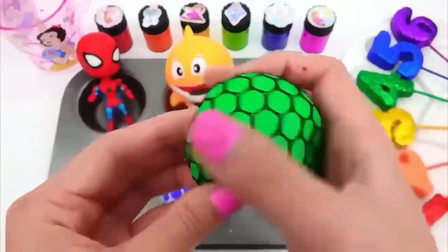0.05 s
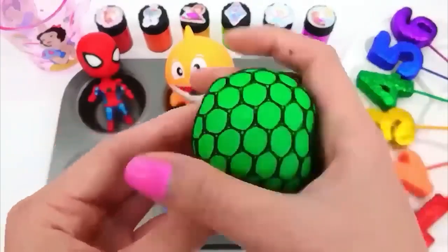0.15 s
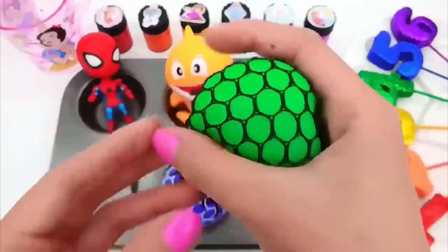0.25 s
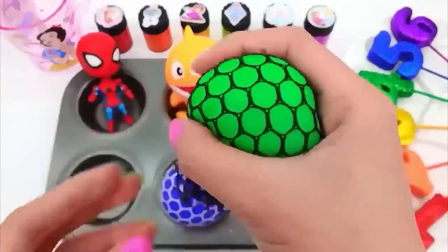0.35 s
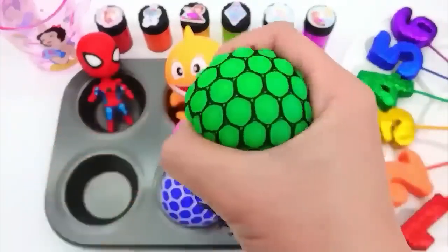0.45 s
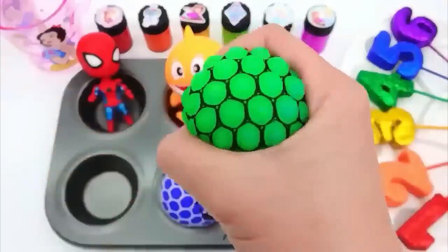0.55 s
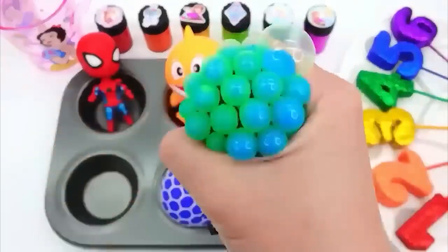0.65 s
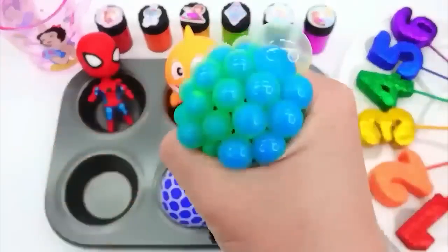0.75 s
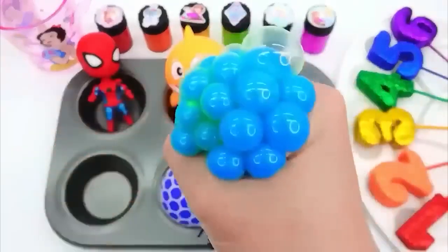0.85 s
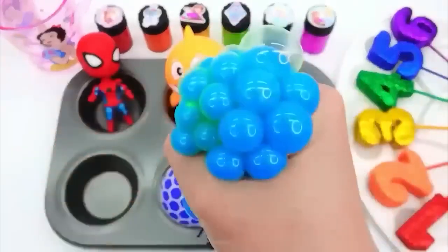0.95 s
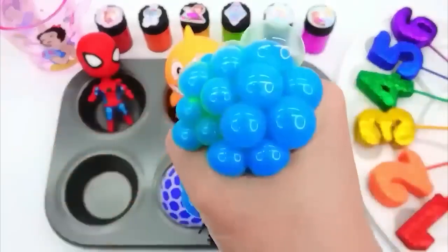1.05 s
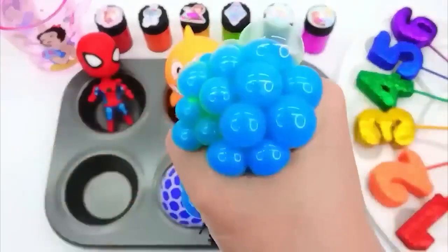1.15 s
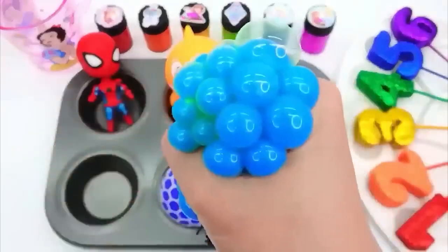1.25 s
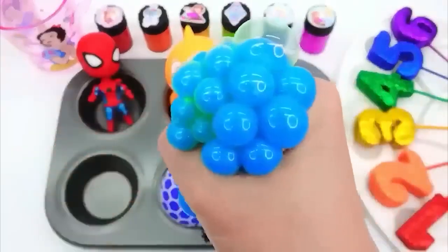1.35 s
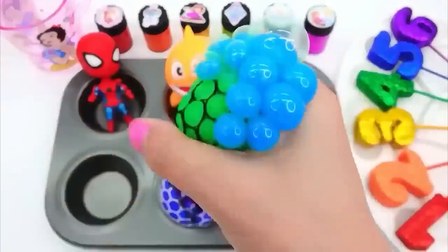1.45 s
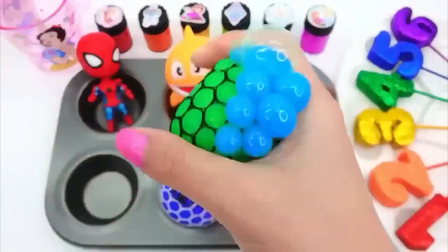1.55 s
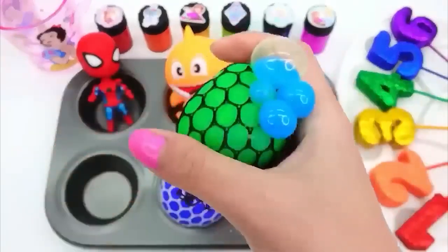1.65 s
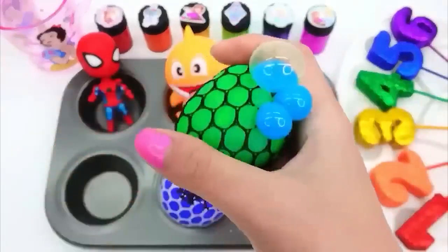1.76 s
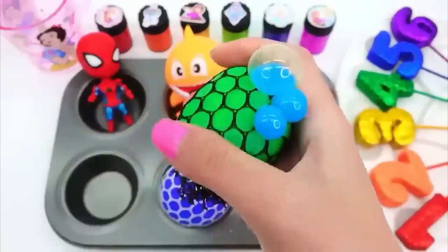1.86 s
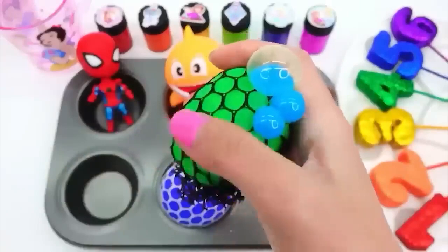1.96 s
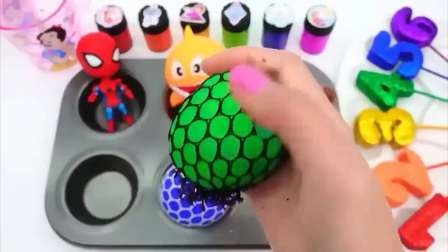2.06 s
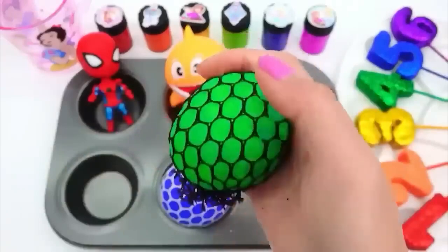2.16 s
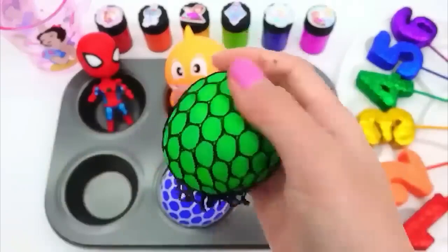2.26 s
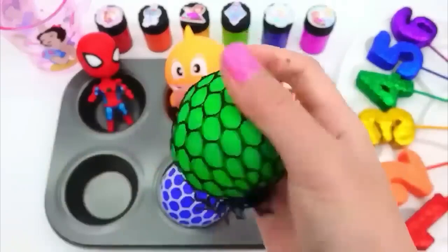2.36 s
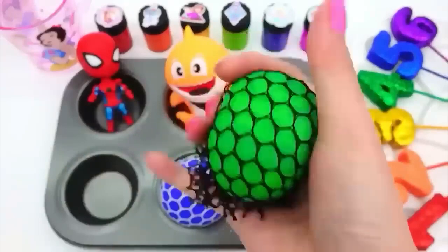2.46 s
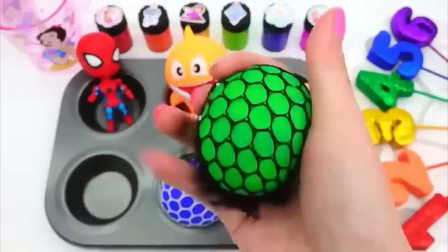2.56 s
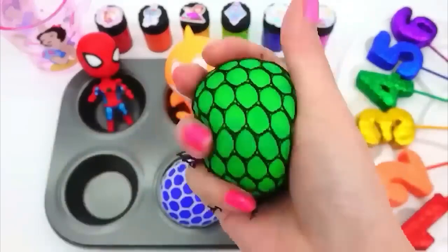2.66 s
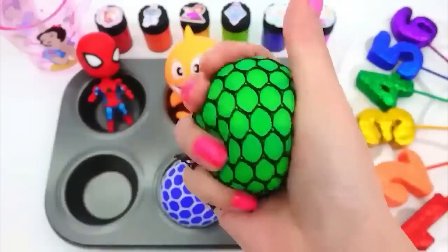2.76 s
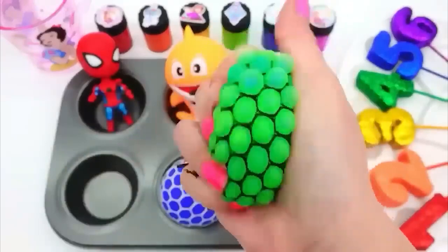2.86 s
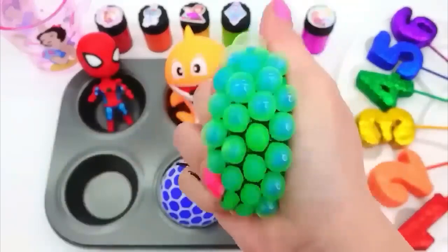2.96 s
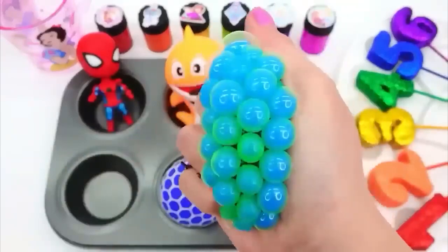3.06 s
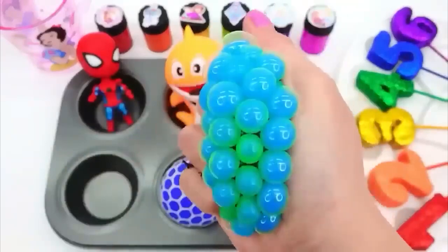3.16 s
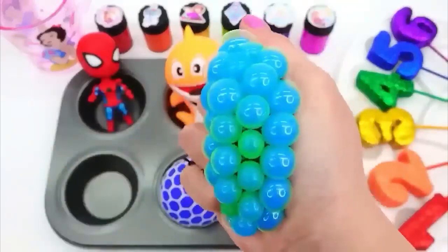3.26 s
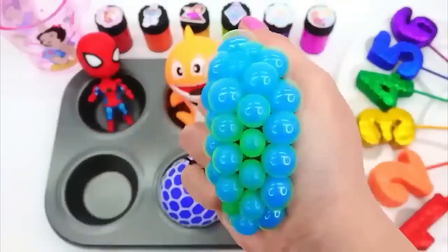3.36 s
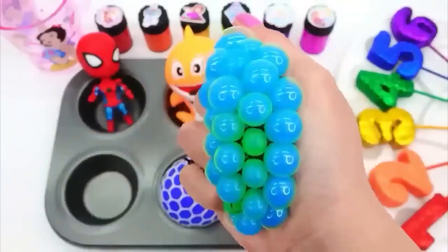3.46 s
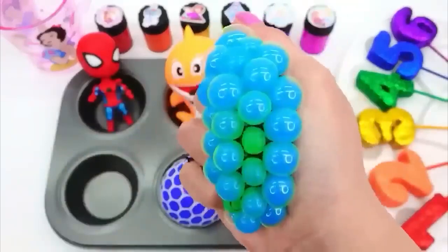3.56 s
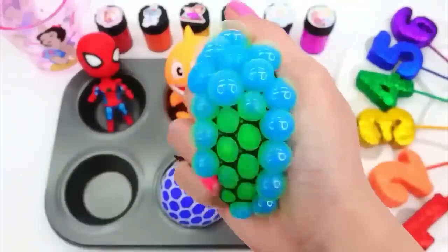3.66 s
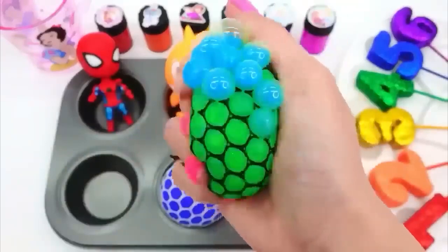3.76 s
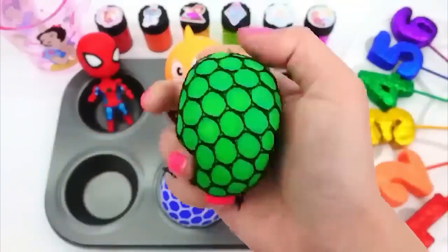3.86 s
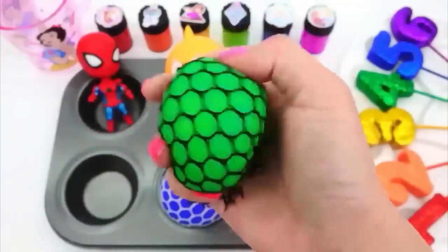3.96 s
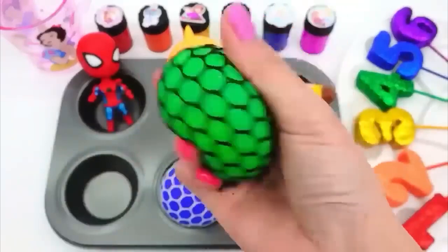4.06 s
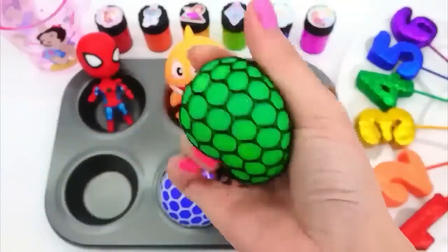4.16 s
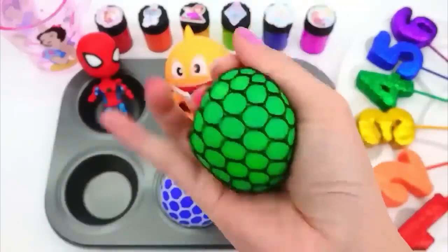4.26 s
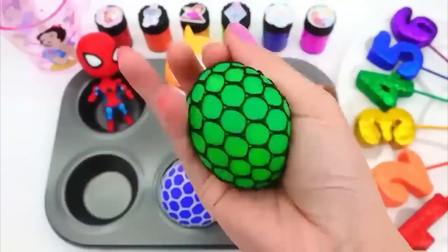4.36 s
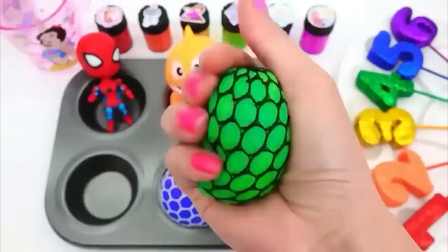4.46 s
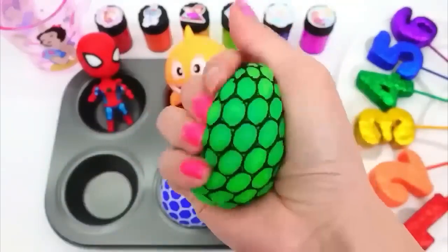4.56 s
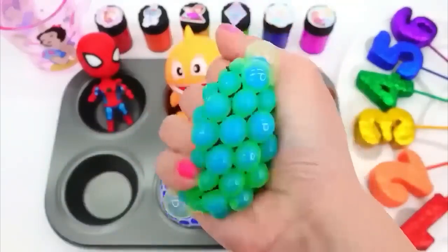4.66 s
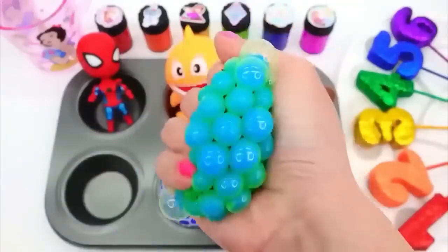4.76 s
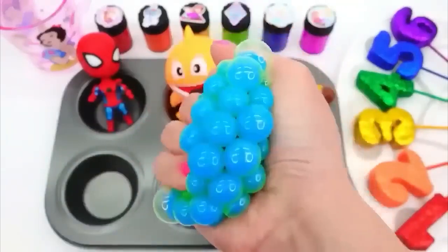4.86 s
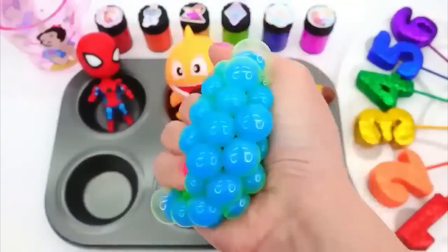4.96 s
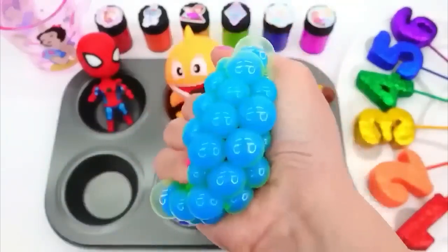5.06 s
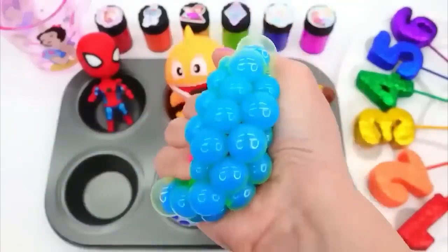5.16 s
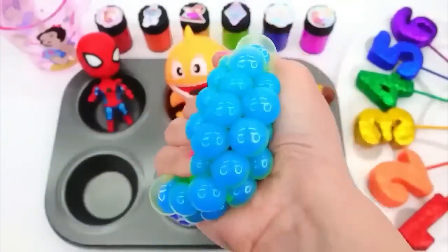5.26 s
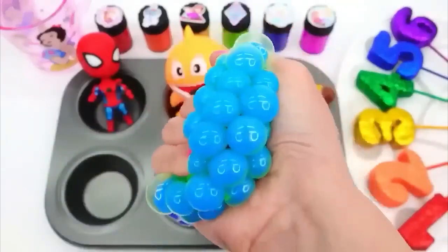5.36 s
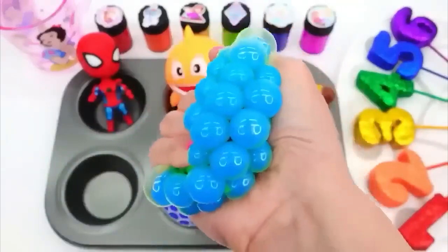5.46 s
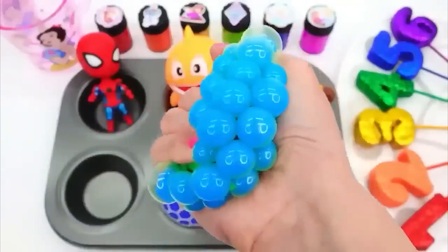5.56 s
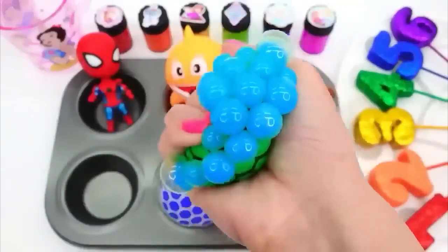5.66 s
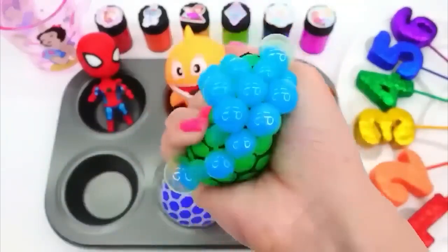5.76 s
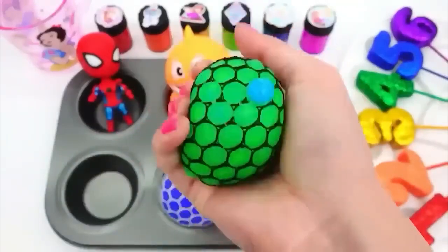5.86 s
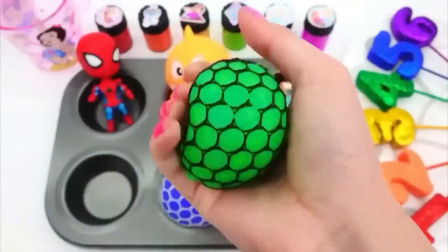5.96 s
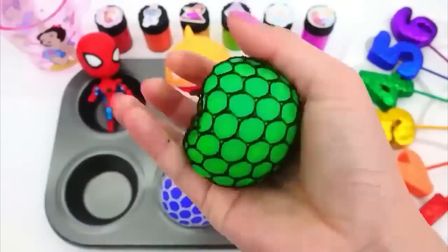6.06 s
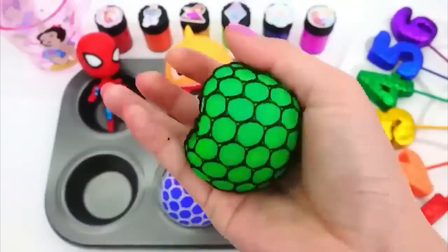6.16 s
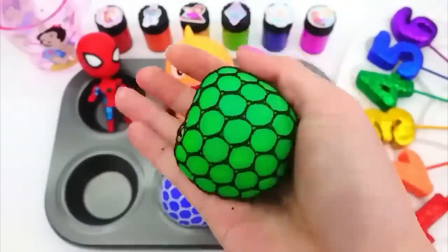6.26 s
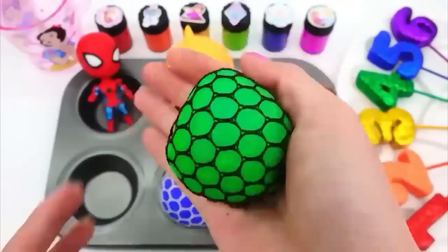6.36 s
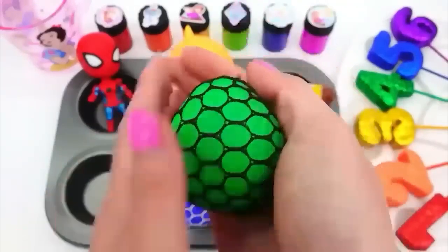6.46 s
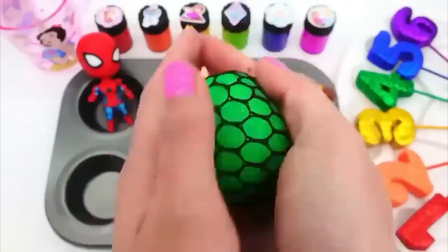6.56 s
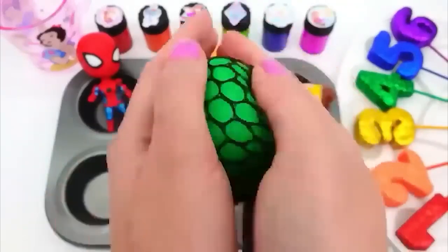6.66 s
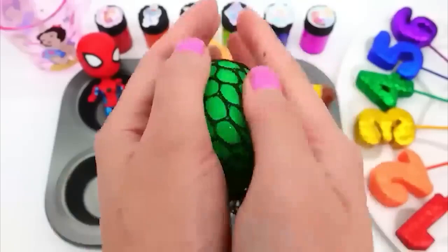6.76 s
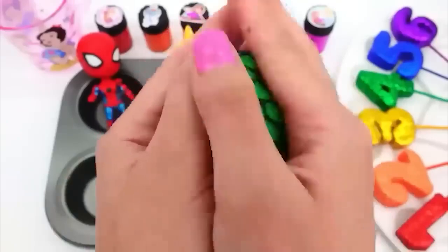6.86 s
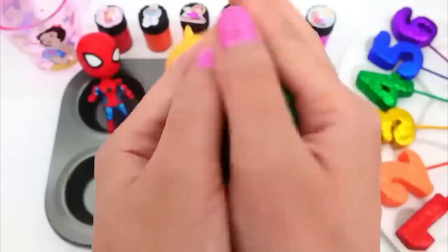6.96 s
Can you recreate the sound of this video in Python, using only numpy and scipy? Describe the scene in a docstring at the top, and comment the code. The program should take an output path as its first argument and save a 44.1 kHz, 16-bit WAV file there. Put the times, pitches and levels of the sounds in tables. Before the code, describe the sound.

A hand squeezes a gel-filled ball in a mesh net three times, with loud wet squelching, crackling pops and faint rubbing between, heard very close.

```python
"""Small live room, close microphone: a hand squeezes a gel ball in a mesh net three times over a metal tray.
Each squeeze and release forces air pockets through the gel: chirping pops over a wet crackle of tiny chirps.
Between squeezes the net rubs in the fingers: random impulses through three filters.
Faint sine blips and a low rumble of filtered noise lie beneath. A fast limiter flattens the loudest pops."""
import sys
import numpy as np
from scipy import signal
from scipy.fft import rfft, irfft
from scipy.io import wavfile
from scipy.ndimage import uniform_filter1d, minimum_filter1d, map_coordinates

SR = 44100
rng = np.random.default_rng(int(sys.argv[2]) if len(sys.argv) > 2 else 0)


def int16_out(signal):
    """Quantize to a 16-bit WAV file."""
    q = np.round(np.clip(np.atleast_2d(signal).T, -1, 1) * 32767)
    wavfile.write(sys.argv[1], SR, q.astype(np.int16))


N = 308700
TIME = np.arange(N) / SR

# air pockets popping: [t/s, relative level/dB, final pitch f/Hz, swell time/s, relative skin snap/dB]
AIR_POCKETS = [(0.8477, -8, 1494, 0.0025, -31.5), (0.8508, -14, 231.5, .002, -34),
               (0.8555, -2.5, 3630, 0.0019, -25), (0.892, 6.5, 3380, 0.0018, -22),
               (1.0511, 1.5, 6340, .003, -10.5), (1.0748, -6.5, 6500, 0.0023, -8.5),
               (1.1228, 3.5, 6240, 0.00099, -9), (1.2052, -18, 10800, .003, -7.5),
               (1.2265, -20, 7030, .003, -3), (1.2985, 3.5, 3974, 0.0015, -14.5),
               (1.2991, -4, 3155, 0.0015, -32.5), (1.3478, -18.5, 7460, 0.00093, 1.5),
               (1.645, -27.5, 4670, 0.0038, -17.5), (1.7079, -11, 10670, 0.0021, -3.5),
               (1.759, -6.5, 3650, 0.0025, -31), (1.766, 3.5, 4130, .0023, -14),
               (1.7903, -8, 3260, .0014, -24), (1.7991, -5.5, 2150, 0.0027, -15),
               (1.827, 3, 2800, 0.00064, -18), (1.8629, -3, 4115, 0.0024, -9),
               (1.8662, -1, 1910, .001, -27.5), (1.9297, -8.5, 3650, 0.00059, 0.5),
               (1.9747, -8.5, 3925, 0.0028, -14), (2.0828, -14.5, 2030, 0.0022, -10),
               (2.303, 0.5, 3337, 0.0028, -15), (2.3101, -3, 1063, 0.0014, -20),
               (2.3574, -5, 930, .0018, -59), (2.409, -39.5, 6660, 0.0017, 20),
               (3.172, -17.5, 503, .002, -36), (3.1719, -1, 1110, 0.0025, -29.5),
               (3.1757, -3.5, 4274, .003, -34.5), (3.239, 8.5, 4960, 0.00074, -27),
               (3.2458, -5, 5190, .003, -27), (3.2739, 5.5, 5400, 0.00037, -19.5),
               (3.328, -4, 4520, 0.0016, -2), (3.3471, 2.5, 4610, 0.0034, -5),
               (3.413, -13, 5580, .003, -9.5), (3.4748, -14, 5000, 0.0034, -1),
               (3.5248, -4, 4380, 0.00026, -3.5), (3.5726, -9, 8650, 0.0011, -9),
               (3.6198, -8, 14800, .0004, -12), (3.6516, -4.5, 10640, 0.00062, -12.5),
               (3.6967, -7, 4550, 0.001, -37.5), (3.7014, -3, 4250, 0.00058, -38),
               (3.7112, -2, 4160, 0.00054, -22.5), (3.7423, -6.5, 4140, .0014, -5.5),
               (3.75, -13, 3865, 0.003, 7), (3.7741, -14, 5000, .0007, -6.5),
               (3.897, -6.5, 3770, 0.0016, -22), (3.904, 8, 5580, 0.0015, -37.5),
               (3.9317, -6, 4500, 0.0039, -21.5), (3.9446, 4, 4440, 0.0017, -15.5),
               (3.9729, -5.5, 4190, 0.003, -17.5), (4.0122, 5, 4940, .0023, -21.5),
               (4.0326, 1.5, 2250, 0.00074, -18.5), (4.0462, -6, 3310, 0.0021, -12),
               (4.0524, -2.5, 1180, 0.0031, -19.5), (4.1125, -2, 1487, .0011, -16),
               (4.8874, -17, 470, .002, -41.5), (4.8891, -9, 1128, 0.00049, -42),
               (4.8889, -3, 4600, 0.0024, -32), (4.8957, -1, 3830, .0023, -38),
               (4.9153, -2.5, 4080, 0.0021, -46), (4.947, -5.5, 3580, 0.0029, -17.5),
               (4.995, 2, 4852, 0.0027, -18.5), (5.009, -5.5, 4550, 0.00055, 0),
               (5.0302, 7.5, 4590, 0.00099, -27), (5.054, -4.5, 5200, .0004, -24),
               (5.0606, -5.5, 4870, .003, -21), (5.0886, -6, 5050, 0.0027, -13.5),
               (5.184, -8, 3150, 0.00055, 0), (5.1983, 4, 4080, .0014, -7),
               (5.2648, -2.5, 5300, 0.0021, -29.5), (5.2865, -6.5, 5480, 0.0012, -24.5),
               (5.4001, -23, 6084, 0.0056, 5.5), (5.41, -16.5, 6490, 0.00244, 4.5),
               (5.571, -29.5, 4740, 0.0016, -3.5), (5.684, -28, 6800, 0.00035, -3),
               (5.806, -23.5, 6100, 0.00114, -3.5), (5.8462, 8.5, 4680, 0.001, -14.5),
               (5.8607, -9.5, 2114, 0.0026, -25), (5.8763, -2.5, 4800, 0.00089, -20.5),
               (5.8971, -2, 4320, 0.0018, -27), (5.9362, 9.5, 5136, 0.0013, -12.5),
               (5.957, -9.5, 3927, 0.004, -17), (5.996, 2.5, 4284, 0.003, -19.5),
               (6.0565, 6.5, 4930, 0.00025, -17.5), (6.075, -1, 2962, 0.0033, -13.5),
               (6.081, -5.5, 1020, 0.0016, -33), (6.1178, -1, 3464, 0.0027, -17.5),
               (6.1208, 0, 1310, 0.0011, -32.5), (6.1517, 3.5, 4140, 0.00097, -14),
               (6.4987, -16.5, 1316, 0.0024, -49)]
# fist closing: [start t/s, length/s, then relative level/dB of large gurgles, small bubbles, sticky skin]
CLOSINGS = [(0.904, 0.22, -30, -42, -51), (1.035, .22, -38.5, -26.5, -28), (3.198, 0.35, -29, -20, -32),
            (3.472, 0.16, -60.5, -69, -33), (4.886, 0.44, -42, -20, -36), (5.198, 0.22, -59, -17, -29),
            (5.399, 0.14, -71.5, -45.5, -42)]
# fist opening: [same columns]
OPENINGS = [(1.704, 0.16, -22.5, -22.5, -27), (1.85, 0.25, -48, -56.5, -59),
            (3.735, 0.077, -72, -25.5, -31.5), (3.892, .29, -18.5, -27, -33),
            (5.838, .18, -33.5, -22.5, -34.5), (6.02, 0.23, -21.5, -32, -34.5)]


def amp(db):
    """Decibels to gain."""
    return 10 ** (np.asarray(db) / 20)


def unit(x):
    """Scales to rms 1."""
    return x / np.sqrt(np.mean(x ** 2) + 1e-20)


def read(points, hz):
    """Reads a spectrum on a log-frequency axis."""
    f, value = np.transpose(points)
    return np.interp(np.log(hz + 1), np.log(f + 1), value)


def colour(x, points):
    """Filters x by a spectrum in dB."""
    gain = amp(read(points, np.fft.rfftfreq(len(x), 1 / SR)))
    return irfft(rfft(x) * gain, len(x))


def noise(points):
    """Coloured noise of rms 1."""
    return unit(colour(rng.standard_normal(N), points))


def level(points):
    """Gain over time from (s, dB) points."""
    s, db = np.transpose(points)
    return amp(np.interp(TIME, s, db, left=-100))


def add(mix, s, sound):
    """Adds a sound to the mix at time s."""
    part = mix[max(round(s * SR), 0):][:len(sound)]
    part += sound[:len(part)]


def swell(t, rise_s):
    """Climbs smoothly to 1 at rise_s, then dies away."""
    u = t / rise_s
    return (u * np.exp(1 - u)) ** 2


def chirp(t, hz, rise_s, glide_octaves, glide_time=1.1):
    """Phasor of a shrinking air pocket: the pitch climbs by glide_octaves towards hz."""
    pitch_hz = hz * 2 ** (-glide_octaves * np.exp(-t / (rise_s * glide_time)))
    return np.exp(2j * np.pi * (np.cumsum(pitch_hz) / SR + rng.random()))


def rumble(rumble_db=-3.0):
    """Low background rumble: coloured noise with a slowly moving level."""
    # rumble spectrum: [f/Hz, level/dB]
    floor_colour = [(20, -20.5), (50, -12), (100, -17), (220, -3), (400, -11), (1000, -8), (4000, -16),
                    (16000, -25)]
    # rumble over time: [t/s, relative level/dB]
    floor_level = [(0.0, -59), (0.99, -57), (1.15, -58.5), (5.63, -58.5), (6.18, -47), (7.0, -68)]
    return amp(rumble_db) * noise(floor_colour) * level(floor_level)


def uneven(tail, ripple_db=1.5, ripple_hz=70):
    """Walls favour some narrow bands and swallow others."""
    z = rfft(tail)
    width_bins = round(ripple_hz * len(tail) / SR)
    ripple = unit(uniform_filter1d(rng.standard_normal(len(z)), size=width_bins))
    return irfft(z * unit(amp(ripple_db * ripple.clip(-2, 2))), len(tail))


def ringing(ring_db=-1, ring_t60_s=0.39):
    """The room's resonances answer a click as decaying sines."""
    # room resonances: [f/Hz, relative level/dB]
    room_modes = [(532, 2.5), (603, 7.5), (706, 3), (769, 6.5), (858, 0.5), (1055, 6.5), (1162, 4.5),
                  (1465, 10), (1706, 3.5), (1932, 7), (2102, 3.5), (2517, 4.5), (3243, -0.5), (3526, 5.5)]
    t = TIME[:SR]
    fade = amp(-60 * t / ring_t60_s)
    modes = sum(amp(db) * np.sin(2 * np.pi * (hz * t + rng.random())) for hz, db in room_modes)
    return amp(ring_db) * 2 * modes * fade / fade.sum()


def room(x, wet_db=-7.0, build_s=0.007, first_db=-7, flutter_s=0.036, flutter=0.1):
    """Sparse reflections build up, flutter between two walls, then die by band."""
    # reverberation time by band: [f/Hz, T60/s]
    room_t60 = [(250, 0.13), (700, 0.94), (1700, 0.55), (4000, 0.5), (8000, 0.47), (15000, 0.9)]
    # reverberation spectrum: [f/Hz, level/dB]
    room_colour = [(60, -17), (250, 10), (600, -7), (1500, -3), (3800, -3), (6000, -4.5), (10000, -10),
                   (16000, -24)]
    t = TIME[:SR]
    taps = rng.choice([-1., 1.], SR) * (rng.random(SR) < 2000 / SR)  # about 2000 reflections/s
    taps = sum(flutter ** k * np.roll(taps, round(k * flutter_s * SR)) for k in range(5))
    taps *= amp(np.interp(t, [0, build_s], [first_db, 0])) * (t > .003)
    hz, at, z = signal.stft(taps, SR, nperseg=256)
    decay = amp(-60 * at / read(room_t60, hz)[:, None])
    tail = signal.istft(z * decay, SR, nperseg=256)[1][:SR]
    mid_decay = amp(-60 * t / room_t60[2][1])
    strength = np.sqrt(np.sum((taps * mid_decay) ** 2))
    response = uneven(tail / strength) + ringing()
    return amp(wet_db) * colour(signal.fftconvolve(x, response)[:N], room_colour)


def tray(x, delay_s=.0016, echo_db=-12.5):
    """The metal tray under the hand returns a quick, filtered first reflection."""
    # tray reflection spectrum: [f/Hz, level/dB]
    tray_colour = [(300, 2), (1500, -1), (4000, -16), (10000, -7.5)]
    echo = np.interp(TIME - delay_s, TIME, colour(x, tray_colour), left=0)
    return x + amp(echo_db) * echo


def blips():
    """Faint soft sine tones that swell and die away."""
    # faint soft blips: [t/s, level/dB, pitch f/Hz, swell time/s]
    blip_rows = [(0.178, -38.5, 688, 0.0062), (0.205, -47.5, 1060, 0.023), (0.335, -42.5, 680, 0.034),
                 (0.364, -32.5, 679, 0.0071), (0.485, -48, 108, 0.062), (0.51, -47, 612, 0.0091),
                 (1.265, -44, 1027, .012), (1.53, -52, 875.6, 0.02), (3.172, -26.5, 185, 0.0071),
                 (5.098, -37, 1136, 0.03), (5.69, -46.5, 255.5, 0.014), (5.752, -36, 770, 0.045)]
    out, t = np.zeros(N), TIME[:SR // 2]
    for s, db, hz, rise_s in blip_rows:
        add(out, s, amp(db) * swell(t, rise_s) * np.sin(2 * np.pi * hz * t))
    return out


def pushes():
    """Dull pushes of the ball against the palm: swells of coloured noise."""
    # pushes: [t/s, level/dB, swell time/s]
    push_rows = [(0.83, -32, 0.0087), (0.8522, -6.5, 0.0013), (1.748, -55, 0.0067), (3.172, -41.5, 0.002),
                 (4.051, -26, 0.0039), (4.112, -30, 0.0059), (5.197, -43, 0.0084), (5.846, -34, 0.0057)]
    # push spectrum: [f/Hz, level/dB]
    push_colour = [(20, -4.5), (90, -14.5), (250, -8.5), (600, -1), (1200, -12.5), (3000, -37)]
    gain = np.zeros(N)
    for s, db, rise_s in push_rows:
        add(gain, s, amp(db) * swell(TIME[:SR // 2], rise_s))
    return gain * noise(push_colour)


def rubbing(order):
    """Gain over time of one part of the net's sound: each slip swells and dies away."""
    # net slipping: [t/s, swell time/s, then relative level/dB of palm rub, thread rasp, hiss]
    rub_rows = [(2.675, 0.025, -46, -38, -46.5), (2.78, 0.061, -61, -70, -89),
                (3.013, 0.038, -86, -43, -89), (3.135, 0.029, -49, -35, -67), (4.3, 0.11, -51, -36.5, -55),
                (4.438, 0.029, -40, -50, -44.5), (4.518, 0.031, -44, -50, -55),
                (4.72, 0.056, -56, -47, -67), (6.42, 0.099, -87.5, -48.5, -89),
                (6.65, 0.019, -54, -59, -97), (6.8, 0.045, -47, -47, -64.5), (6.95, 0.04, -60, -51, -43)]
    gain = np.zeros(N)
    for s, rise_s, *db in rub_rows:
        add(gain, s, amp(db[order]) * swell(TIME[:SR], rise_s))
    return gain


def net(rub_db=3.5, rasp_db=-5.5, hiss_db=-2.5, slips_per_s=3000, spread_db=-2.5, grip_db=3):
    """Threads stick and slip on the skin in uneven bouts and ring the hollow of the hand."""
    # palm rub spectrum: [f/Hz, level/dB]
    rub_colour = [(500, -21.5), (880, -18), (1080, 16.5), (1220, 8.5), (1450, -11), (2000, -37.5)]
    # thread rasp spectrum: [f/Hz, level/dB]
    rasp_colour = [(900, -38), (1350, 1.5), (1600, 6.5), (1950, 6), (2600, -8.5), (4500, -8), (8000, -38)]
    # hiss spectrum: [f/Hz, level/dB]
    hiss_colour = [(2500, -26), (4500, -1.5), (8000, 15), (14000, 10.5), (16000, -27.5)]
    slips = (rng.random(N) < slips_per_s / SR) * rng.standard_normal(N)
    slips *= amp(spread_db * np.minimum(rng.exponential(1, N), 4))
    grip = unit(uniform_filter1d(rng.standard_normal(N), size=900))
    slips *= amp(grip_db * grip)
    parts = [(rub_db, rub_colour), (rasp_db, rasp_colour), (hiss_db, hiss_colour)]
    return sum(amp(db) * unit(colour(slips, points)) * rubbing(k) for k, (db, points) in enumerate(parts))


def bubbles(low_hz, high_hz, per_s, cycles, spread_db, count=24):
    """A swarm of tiny rising chirps of unequal size, rms 1."""
    t, out = TIME[:600], np.zeros(N)
    fired = rng.random(N) < per_s / SR
    size = np.minimum(rng.exponential(1, N), 3)
    kind = rng.integers(0, count, N)
    clicks = amp(spread_db * size) * rng.choice([-1, 1], N)
    for k, hz in enumerate(np.geomspace(low_hz, high_hz, count)):
        rise_s = cycles / hz
        grain = unit(swell(t, rise_s) * chirp(t, hz, rise_s, glide_octaves=0.32).real)
        for at in np.flatnonzero(fired & (kind == k)):
            add(out, at / SR, clicks[at] * grain)
    return unit(out)


def gulp(gulp_db=-3):
    """A low, dense gurgle as the gel slumps back into a round ball."""
    # gel running back: [t/s, relative level/dB]
    gulp_level = [(2.31, -20), (2.39, -15.5), (2.47, -35.5)]
    # gurgle spectrum: [f/Hz, level/dB]
    gulp_colour = [(120, -59.5), (200, -7), (333, -29.5), (401, -18), (790, -5), (908, -7), (1180, -7.5),
                   (1290, -20), (2630, -20), (3370, -6.5), (4380, -24), (8000, -37.5), (10400, -88),
                   (17600, -120)]
    swarm = bubbles(low_hz=372, high_hz=4940, per_s=770, cycles=1.0, spread_db=-2.5)
    gurgle = unit(colour(swarm, gulp_colour))
    return amp(gulp_db) * gurgle * level(gulp_level) * (TIME < gulp_level[-1][0])


def effort(order, edge_s=0.0083):
    """Gain over time of one bubble size: in every stroke it climbs to a crest and falls away."""
    # squeeze, large pockets first: [share of stroke at the crest of gurgles, bubbles, skin]
    squeeze_crest = (.22, 0.25, .46)
    # release, skin first and large pockets last: [same columns]
    release_crest = (0.69, .5, 0.16)
    # fall away from the crest, dB per stroke length
    squeeze_fall_db, release_fall_db = (43, 40.5, 41), (48.5, 37, 30.5)
    gain = np.zeros(N)
    for strokes, crest, fall_db in ((CLOSINGS, squeeze_crest, squeeze_fall_db),
                                    (OPENINGS, release_crest, release_fall_db)):
        for start_s, length_s, *db in strokes:
            t = np.arange(-edge_s / 2, length_s + edge_s / 2, 1 / SR)
            inside = np.clip(np.minimum(t, length_s - t) / edge_s + .5, 0, 1)
            off_crest = abs(t / length_s - crest[order])
            add(gain, start_s + t[0], inside * amp(db[order] - fall_db[order] * off_crest))
    return gain


def bouts(depth_db, length_s):
    """A random gain of rms 1 that gathers grains into clumps."""
    drift = unit(uniform_filter1d(rng.standard_normal(N), size=round(length_s * SR)))
    return unit(amp(depth_db * drift.clip(-2.5, 2.5)))


def stretched(x, bend_octaves=.5, usual=.7):
    """Bubbles sound higher as the ball tightens and lower as it slackens."""
    # stretch of the skin under the fingers: [t/s, stretch from 0 slack to 1 tight]
    stretch = [(0.85, 0.097), (1.1, 0.97), (1.7, 0.83), (2.1, 0.17), (3.17, 0.26), (3.3, 1), (3.74, 0.79),
               (4.15, .2), (4.9, .1), (5.06, 0.78), (5.5, 0.97), (5.85, 0.52), (6.2, 0.32)]
    speed = 2 ** (bend_octaves * (np.interp(TIME, *np.transpose(stretch)) - usual))
    return map_coordinates(x, [np.cumsum(speed) % (N - 1)], order=3)


def squelch(gurgle_db=-3):
    """Three sizes of bubble crackle while the gel is pushed through the net."""
    large = bubbles(low_hz=548, high_hz=2873, per_s=1000, cycles=1.0, spread_db=6.5)
    small = bubbles(low_hz=3598, high_hz=5500, per_s=1300, cycles=2.3, spread_db=3.5)
    sticky = bubbles(low_hz=7130, high_hz=14700, per_s=2800, cycles=4.6, spread_db=2.5)
    gurgles = amp(gurgle_db) * large * effort(order=0)
    crackle = stretched(small) * effort(order=1)
    skin = sticky * effort(order=2) * bouts(depth_db=4.5, length_s=.003)
    return gurgles + crackle + skin


def satellites(size_db=-19, spread_db=1.5, scatter_s=0.0029, lag_s=0.0089, detune_octaves=0.2, cycles=2.7,
               count=7):
    """Smaller pockets of like pitch break just after each listed pop."""
    t, out = TIME[:600], np.zeros(N)
    for s, db, hz, *_ in AIR_POCKETS:
        for when, size, pitch in rng.standard_normal((count, 3)).clip(-2, 2):
            own_hz = min(hz * 2 ** (detune_octaves * pitch), SR / 3)
            rise_s = cycles / own_hz
            ring = swell(t, rise_s) * chirp(t, own_hz, rise_s, glide_octaves=0.12).real
            add(out, s + lag_s + scatter_s * when, amp(db + size_db + spread_db * size) * ring)
    return out


def stray_pops(count=6, above_db=8, spread_db=7.5, detune_octaves=0.16, swell_s=0.0012):
    """Rows of random pops in each stroke; level follows its crackle, pitch the bubbles busiest then."""
    # strays among large gurgles, small bubbles, sticky skin: [pitch f/Hz, relative skin snap/dB]
    strays = [(1500, -24), (4300, -19), (9000, -4.5)]
    rows, busy = [], np.array([effort(order=k) for k in range(3)]) + 1e-9
    pitches_hz, snaps_db = np.transpose(strays)
    for start_s, length_s, *_ in CLOSINGS + OPENINGS:
        times = start_s + length_s * (np.arange(count) + rng.random(count)) / count
        for s, (size, pitch, slow) in zip(times, rng.standard_normal((count, 3)).clip(-2, 2)):
            power = busy[:, round(s * SR)] ** 2
            share = power / power.sum()
            db = 10 * np.log10(power.sum()) + above_db + spread_db * size
            hz = 2 ** (share @ np.log2(pitches_hz) + detune_octaves * pitch)
            rows.append((s, db, hz, swell_s * 2 ** (slow / 2), share @ snaps_db))
    return rows


def pops(rows, froth_time_s=0.0013, froth_width=0.12, least_width_hz=450, snap_db=6, snap_length=0.71,
         pop_db=0.5, glide_octaves=0.4574):
    """Quick pockets ring cleanly, slow ones tear into froth; the skin snaps as each one opens."""
    # gel's filter on the froth: [f/Hz, level/dB]
    froth_colour = [(100, -38.5), (400, -25.5), (1000, -10), (1700, 2), (4300, 0), (5800, -10),
                    (9000, -3.5), (16000, -11)]
    # skin snap spectrum: [f/Hz, level/dB]
    snap_colour = [(1500, -36), (4000, 10), (7000, 9.5), (12000, 3.5), (16000, -6.5)]
    # small pockets radiate little bass: [f/Hz, level/dB]
    pocket_colour = [(40, -6), (110, -11), (220, 0), (16000, -0.5)]
    t = TIME[:1024]
    rings, froths, snaps = np.zeros((3, N))
    crack = noise(snap_colour)
    for k, (s, db, hz, rise_s, skin_db) in enumerate(rows):
        shape = amp(db) * swell(t, rise_s)
        turn = chirp(t, hz, rise_s, glide_octaves)
        # narrow-band complex noise smears the chirp into froth
        r = np.exp(-np.pi * (least_width_hz + froth_width * hz) / SR)
        a, b = rng.standard_normal((2, 2 * len(t)))
        blur = signal.lfilter([1], np.poly([r, r ** 4]), a + 1j * b)[len(t):]
        blur /= np.sqrt(np.average(abs(blur) ** 2, weights=shape ** 2))
        froth = rise_s ** 2 / (rise_s ** 2 + froth_time_s ** 2)  # share of power
        add(rings, s, np.sqrt(1 - froth) * shape * turn.real)
        add(froths, s, np.sqrt(froth) * shape * (blur * turn).real)
        snap_shape = amp(db + skin_db + snap_db) * swell(t, rise_s * snap_length)
        snap = snap_shape * crack[k * len(t):][:len(t)] / 2
        add(snaps, s + rise_s * (1 - snap_length) / 2, snap)
    return amp(pop_db) * colour(rings + colour(froths, froth_colour) + snaps, pocket_colour)


def scene():
    """The close sounds with their tray echo, the room and the rumble, the same in both channels."""
    gel = gulp() + squelch() + satellites() + pops(AIR_POCKETS + stray_pops())
    close = tray(blips() + pushes() + net() + gel)
    mono = rumble() + room(close) + close
    return np.array([mono, mono])


def suppress(x, depth_db=-20):
    """A noise suppressor turns down every narrow band that stays under its threshold."""
    # suppressor threshold: [f/Hz, level/dB]
    quiet = [(100, -92.5), (250, -74.5), (500, -82.5), (1100, -72), (2000, -74), (4000, -85), (8000, -91.5),
             (16000, -87.5)]
    hz, _, z = signal.stft(x, SR, nperseg=1024, noverlap=768)
    power = abs(uniform_filter1d(abs(z) ** 2, size=7, axis=-1))
    over = (power / amp(read(quiet, hz))[:, None] ** 2) ** 2
    gain = np.maximum(over / (1 + over), amp(depth_db))
    return signal.istft(z * gain, SR, nperseg=1024, noverlap=768)[1][:, :N]


def record(dry, drive_db=-0.5, ceiling=0.93, edge_hz=16100):
    """Noise suppressor, a fast look-ahead limiter that holds peaks to the ceiling, then the band limit."""
    x = suppress(dry) * amp(drive_db)
    gain = np.minimum(1, ceiling / (abs(x).max(0) + 1e-9))
    gain = uniform_filter1d(minimum_filter1d(gain, size=45), size=45)  # about 1 ms
    lowpass = signal.firwin(255, edge_hz, window=("kaiser", 9), fs=SR)
    return signal.oaconvolve(x * gain, lowpass[None], "same")


dry = scene()
out = record(dry)
int16_out(out)
```